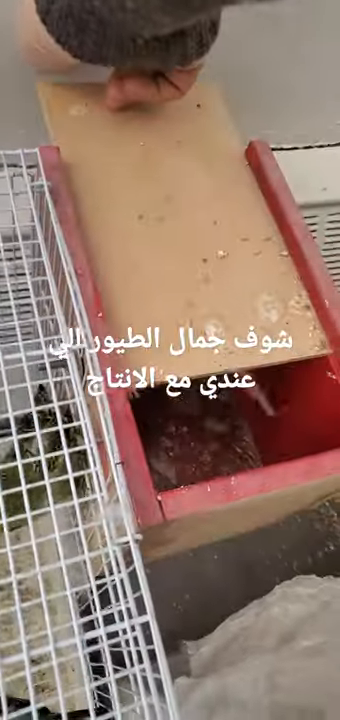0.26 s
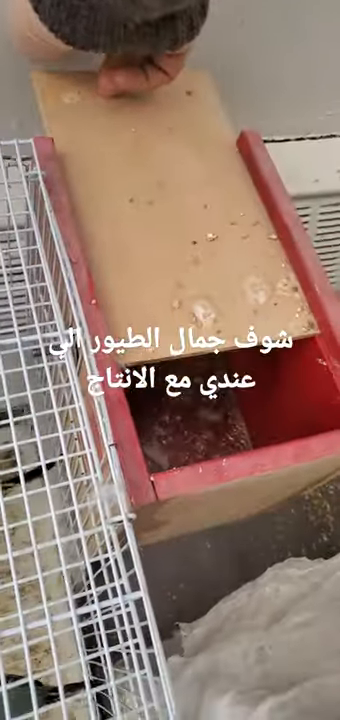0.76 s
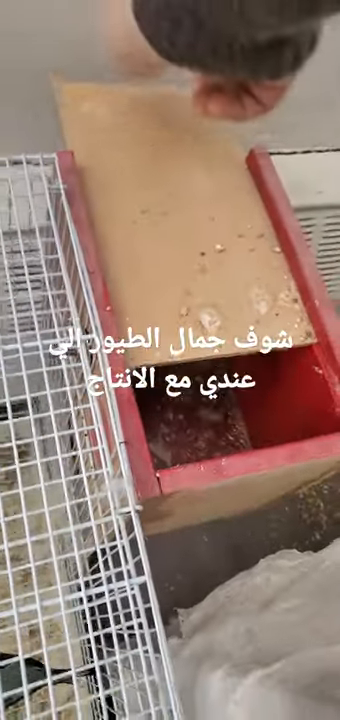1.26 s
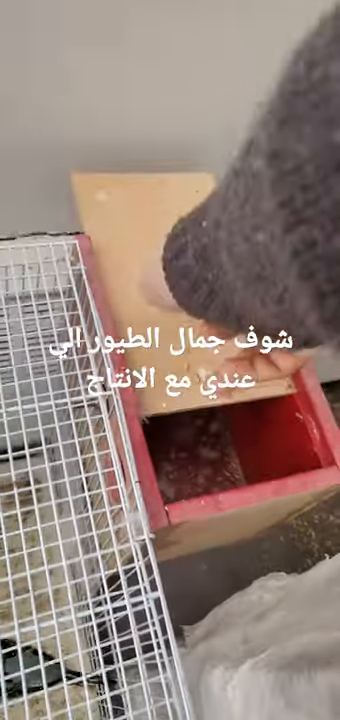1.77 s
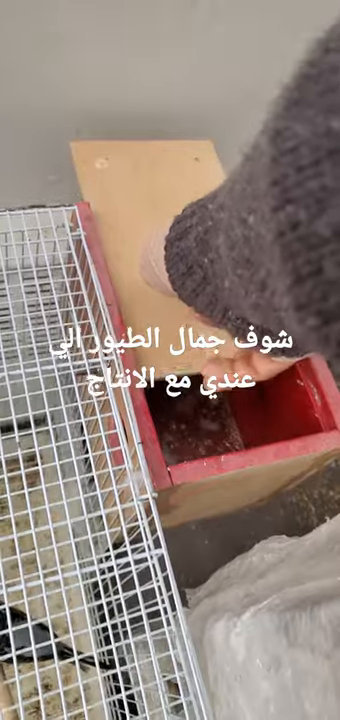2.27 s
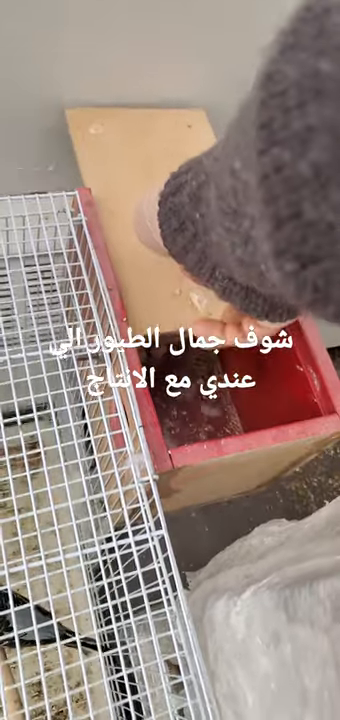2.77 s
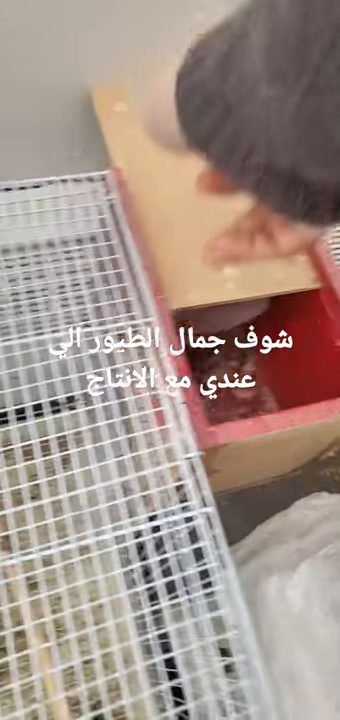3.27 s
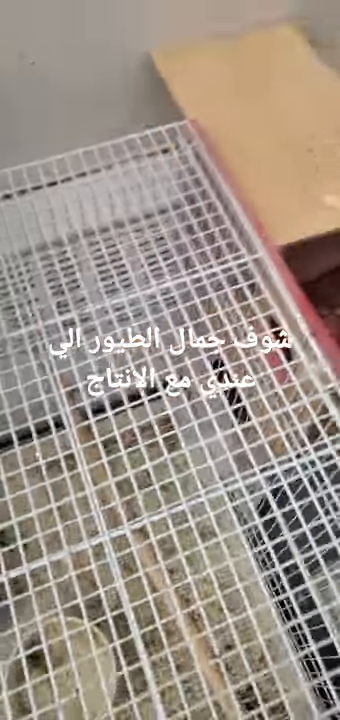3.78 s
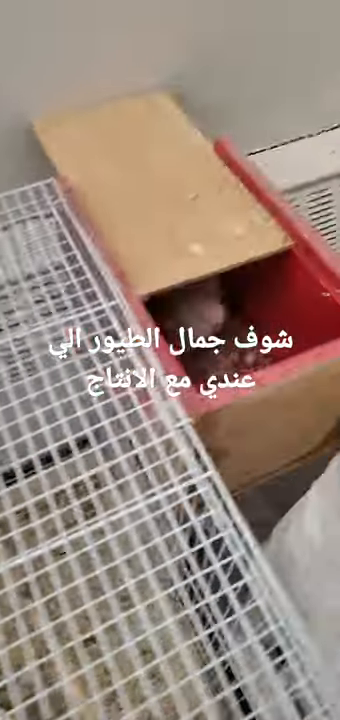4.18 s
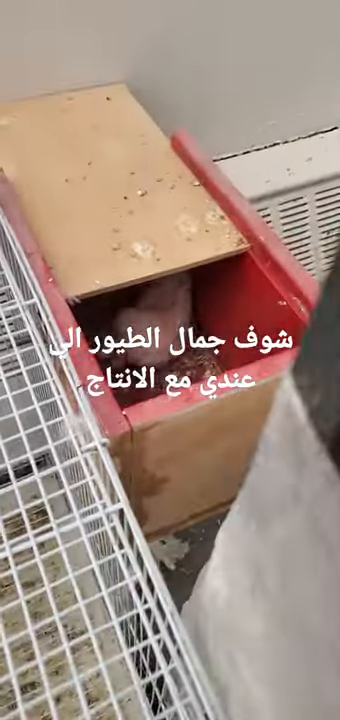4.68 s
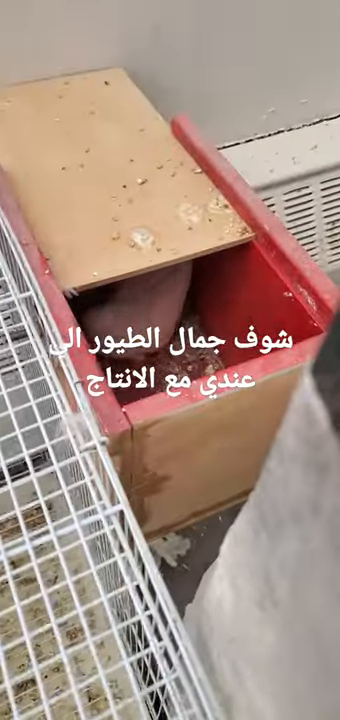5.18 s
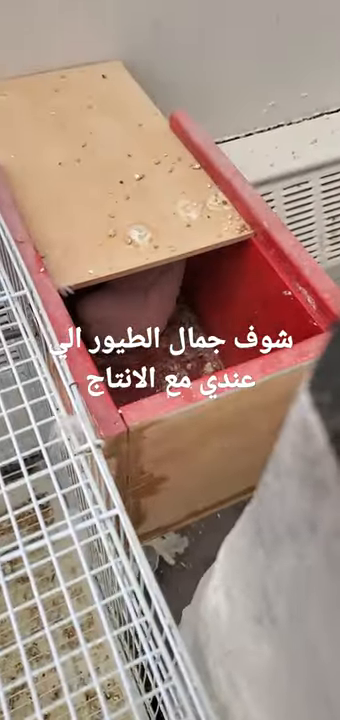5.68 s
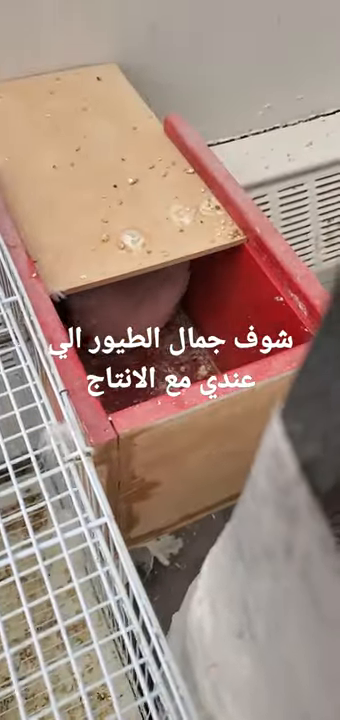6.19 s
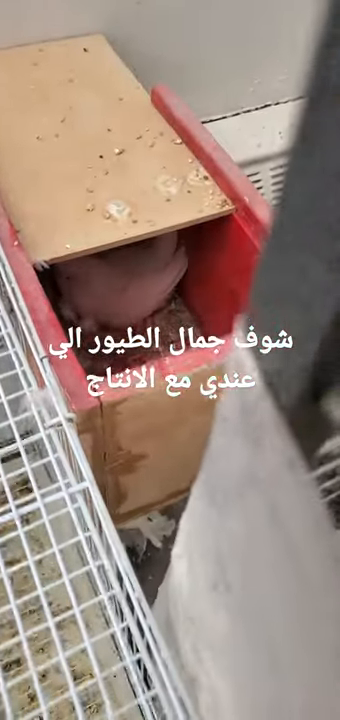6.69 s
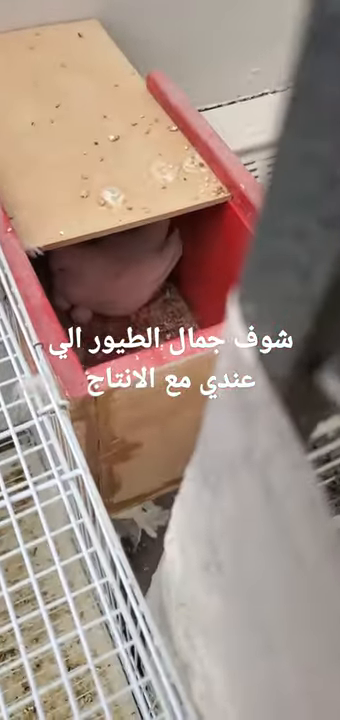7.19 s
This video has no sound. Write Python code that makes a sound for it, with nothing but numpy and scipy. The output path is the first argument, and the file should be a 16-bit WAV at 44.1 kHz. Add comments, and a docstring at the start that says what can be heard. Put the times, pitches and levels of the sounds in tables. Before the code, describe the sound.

Close up, a young budgerigar in a wooden nest box begs without pause, in short harsh rasps six or seven a second. The lid knocks lightly during the first second, a hand thuds the box near the three-second mark, and sleeve and fingers rub softly. Other birds whistle faintly in the small, hard room above a low hum and light hiss.

```python
"""Budgerigar chick begging in a nest box

Harsh rasping cheeps, six or seven a second, close to a phone that moves from the lid round to the opening:
bursts of noise puffed by the syrinx, coloured by throat, box and microphone place. Lid knocks and a box thud
are ringing wood modes; rubbing is shaped noise. Other budgerigars whistle faintly in the small, echoing room,
over a low hum of wandering tones and a floor of rumble and hiss."""
import sys
import numpy as np
from scipy import signal
from scipy.fft import rfft, irfft, next_fast_len
from scipy.io import wavfile

SR = 44100
rng = np.random.default_rng(int(sys.argv[2]) if len(sys.argv) > 2 else 0)


def output_pcm(signal):
    """Save a mono or channel-first signal as 16-bit PCM at the path in sys.argv[1].

    Samples are clipped to [-1, 1] before scaling.
    """
    pcm = np.clip(np.atleast_2d(signal).T, -1, 1) * 32767
    wavfile.write(sys.argv[1], SR, np.round(pcm).astype(np.int16))


N = 327663
TIME = np.arange(N) / SR
TOP_HZ = 15900  # upper limit of the recorded sound


def undb(db):
    """Decibels to gain."""
    return 10 ** (np.asarray(db) / 20)


def unit(x):
    """Scale to rms 1."""
    return x / np.sqrt(np.mean(x ** 2) + 1e-18)


def read(points, hz):
    """Read a (hz, value) table along log frequency."""
    table_hz, value = np.transpose(points)
    return np.interp(np.log(hz + 1), np.log(table_hz), value)


def at(curve, s):
    """Read a (s, value) curve at time s."""
    return np.interp(s, *np.transpose(curve))


def peak(hz, centre_hz, width_hz):
    """Bell-shaped outline of a resonance, 1 at its centre."""
    return 1 / (1 + ((hz - centre_hz) / width_hz) ** 2)


def noise(points, size):
    """Noise coloured by a (hz, db) table, rms 1."""
    hz = np.fft.rfftfreq(size, 1 / SR)
    white = rng.standard_normal(size)
    return unit(irfft(rfft(white) * undb(read(points, hz)), size))


def walk(rate, size):
    """A random drift with about `rate` turns a second."""
    steps = np.arange(size) / SR * rate
    return np.interp(steps, np.arange(2048), rng.standard_normal(2048))


def add(out, s, x):
    """Mix x into out from time s, trimming whatever falls outside."""
    i = int(round(s * SR))
    x = x[..., max(-i, 0):max(N - i, 0)]
    start = max(i, 0)
    out[:, start:start + x.shape[-1]] += x


def chick(size=8192, early_s=.0045, lowest_hz=950):
    """Each rasp passes the throat, the box and the shading of the two microphones."""
    # the begging cheeps: start_s, middle_band_db
    cheeps = [(.005, -16), (0.12, -16.5), (.245, -16), (.371, -16.5), (.504, -16), (0.642, -17.5),
              (.785, -17), (0.943, -16), (1.108, -16), (1.268, -18.5), (1.423, -17), (1.583, -17.5),
              (1.749, -17.5), (1.928, -20), (2.083, -20.5), (2.23, -19.5), (2.377, -19), (2.523, -19.5),
              (2.673, -19.5), (2.816, -18.5), (2.968, -18), (3.116, -16), (3.271, -16.5), (3.428, -15),
              (3.601, -16), (3.762, -15.5), (3.901, -15), (4.043, -16), (4.177, -17), (4.325, -16),
              (4.482, -15), (4.632, -17), (4.772, -17), (4.914, -17.5), (5.064, -16), (5.217, -15.5),
              (5.372, -15.5), (5.528, -15), (5.69, -16), (5.856, -16.5), (6.024, -17), (6.196, -17),
              (6.397, -17), (6.586, -16), (6.784, -16.5), (6.999, -16), (7.166, -16.5), (7.328, -16)]
    # cheeps start clipped and draw out as the chick settles into begging: time_s, length_s
    cheep_length = [(0, 0.045), (.65, 0.059), (.95, 0.07), (2.1, 0.064), (2.9, 0.074)]
    # the phone's swing round the box: time_s, share_of_way (0-1), left_lead_ms
    swing = [(2.9, 0.27, 0.024), (3.7, 0.52, .12), (5.2, 0.88, 0.12), (6.3, 1, 0.13)]
    hz = np.fft.rfftfreq(size, 1 / SR)
    shape = (2, 60)  # sides, bounces
    walls = rng.exponential(size=shape), rng.choice([-1., 1.], shape), rng.standard_normal(shape)
    beak = 1 - np.exp(-(hz / lowest_hz) ** 5)  # so small a bird radiates no bass
    swing_s, share, lead = np.transpose(swing)
    out = np.zeros((2, N))
    for (s, db), chance in zip(cheeps, rng.standard_normal((len(cheeps), 2))):
        length = at(cheep_length, s)
        beside = np.interp(s, swing_s, share)
        lead_ms = np.interp(s, swing_s, lead)
        # the rasp starts early_s before the listed time and swells in softly
        voice = rfft(rasp(length + early_s, size)) * beak
        voice = voice * box_paths(s, lead_ms, walls, hz)
        colour = place_colour(s, hz) + throat(s, beside, chance, hz)
        voice = voice * undb(colour + microphone_shade(beside, hz))
        cheep = irfft(voice * undb(db + effort(voice, s, length, hz)))
        add(out, s - early_s, cheep[:, :SR // 7])
    return out


def rasp(length, size, flutter_hz=141, jitter=0.038, puff_s=0.0017, leak=0.2, scatter_db=-1.0,
         grain_db=2.0, swell_s=0.011, sag_db=-2, release_s=0.011):
    """The syrinx opens in uneven puffs; each puff is a burst of chaotic, crackling vibration."""
    t = np.arange(size) / SR
    puffs = np.zeros(size)
    start = 0
    for late, strength in rng.standard_normal((16, 2)):
        age = np.maximum(t - start, 0) / puff_s
        puffs += undb(scatter_db * strength) * age * np.exp(1 - age)
        start += (1 + jitter * late) / flutter_hz
    # pressure builds over the first few puffs; a 75 ms rasp takes swell_s, shorter ones are snapped out
    rise_s = swell_s * (length / .075) ** 2
    release = np.clip((length - t) / release_s, 0, 1)
    pressure = (1 - np.exp(-(t / rise_s) ** 2)) * release
    sag = undb(sag_db * np.minimum(t / length, 1))
    crackle = rng.standard_normal(size) * undb(grain_db * walk(2500, size))
    # later the syrinx closes less and the puffs run together
    flow = puffs + 2 * leak * t / length
    return flow * pressure * sag * crackle


def throat(s, beside, chance, hz, upper_db=4, lower_db=6, width_hz=280, facing_db=4, scatter=0.036):
    """Two moving throat resonances, in dB, scattered from cheep to cheep."""
    # upper resonance before scatter: time_s, centre_hz
    upper_throat = [(2.8, 6250), (3, 7260), (3.76, 7200), (3.9, 6500), (4.1, 5540), (5.7, 5500),
                    (6.5, 5100), (7.2, 5800)]
    # lower resonance before scatter: time_s, centre_hz
    lower_throat = [(.7, 4220), (1.1, 3350), (3.65, 2250), (4.04, 4040), (4.63, 3699), (4.8, 2270),
                    (5.85, 3430), (6.4, 1870), (7, 1870), (7.3, 4000)]
    centres_hz = np.array([at(upper_throat, s), at(lower_throat, s)])
    upper_hz, lower_hz = centres_hz * (1 + scatter * chance)
    # the upper one stands out more as the phone comes round to the opening
    upper = (upper_db + facing_db * beside) * peak(hz, upper_hz, width_hz)
    return upper + lower_db * peak(hz, lower_hz, width_hz)


def box_paths(s, lead_ms, walls, hz, echo_db=0, first_s=.0007, spread_s=.0025, drift=.07):
    """The direct path and the bounces inside the box; their lengths creep as the phone moves."""
    flight, sign, creep = walls
    paths = np.zeros((2, 2 * len(hz) - 2))
    for side in range(2):
        stretch = np.exp(drift * creep[side] * (s - TIME[-1] / 2))
        delay = (first_s + spread_s * flight[side]) * stretch
        sample = np.clip(delay * SR, 0, len(hz) // 2).astype(int)
        np.add.at(paths[side], sample, sign[side])
    bounces = rfft(paths) / np.sqrt(sign.shape[1]) * undb(echo_db)
    lag_s = np.array([[0], [lead_ms / 1000]])  # the right microphone hears it later
    direct = np.exp(-2j * np.pi * hz * lag_s)
    return direct + bounces


def place_colour(s, hz, thin_db=-7.5):
    """Colour of the cheeps, in dB, blended between four places of the phone round the box."""
    # phone at the narrow lid gap: hz, relative_db
    lid_narrow = [(1250, -19), (2100, -14), (3000, -6), (4000, -6), (4500, -15.5), (5700, -4.5),
                  (8100, -11), (8900, -10), (11900, 7), (13700, -3.5), (15500, 1)]
    # phone under the arm: hz, relative_db
    under_arm = [(1250, -3.5), (2100, -6), (2500, -1), (4500, -6), (5900, -3), (7000, -8), (8100, 1.5),
                 (9200, -15.5), (11600, -3.5), (14000, -14.5), (15500, -12)]
    # phone beside the box: hz, relative_db
    beside_box = [(1400, -20.5), (1930, -3.5), (2160, -16.5), (2600, -4.5), (4700, -5), (5550, -4),
                  (7400, -10), (9400, -18), (12000, -7), (15500, -14)]
    # phone at the opening: hz, relative_db
    at_opening = [(1200, -21.5), (1900, -8), (2200, -11.5), (2750, -6), (3200, -14.5), (3650, -0.5),
                  (4450, -10.5), (5250, -2), (5900, -2), (7200, -7), (8500, -4.5), (9600, -19.5),
                  (15500, -26)]
    # when the phone is at each of these places: time_s
    place_s = [0.5, 2.5, 4.8, 6.6]
    colours = np.array([read(c, hz) for c in (lid_narrow, under_arm, beside_box, at_opening)])
    place = np.array([np.interp(s, place_s, row) for row in np.eye(len(place_s))])
    # at the opening the cheeps sound thinner around 3.1 kHz
    thinning = place[-1] * thin_db * peak(hz, 3100, 280)
    return place @ colours + thinning


def microphone_shade(beside, hz):
    """Each microphone takes half the left-right difference, in dB, as the phone swings round."""
    # shading above the box: hz, left_minus_right_db
    shade_above = [(1200, -2), (4000, -2.5), (5400, 0), (7200, 2.5), (8200, 2.5), (11000, -4.5), (13500, 0)]
    # shading beside the box: hz, left_minus_right_db
    shade_beside = [(1200, 4.5), (4000, -1), (5400, 5.5), (8400, 9), (11200, 0), (13400, 6)]
    shade = (1 - beside) * read(shade_above, hz) + beside * read(shade_beside, hz)
    return np.array([shade, -shade]) / 2


def effort(voice, s, length, hz, knees_hz=(3300, 5000, 8200, 10500)):
    """Effort and beak opening set the weight, in dB, of the low, middle and top of each cheep."""
    # low band against the middle: time_s, relative_db
    low_band = [(.2, -9.5), (.9, -12), (1.93, -6.5), (2.85, -7), (3.95, -12), (4.4, -5), (4.7, -10.5),
                (4.97, -1), (5.25, -12), (5.8, -7.5)]
    # treble against the middle, dropping when the phone leaves the top of the box: time_s, relative_db
    treble = [(3.12, -4), (3.35, -11), (4.3, -6.5), (4.75, -9.5), (4.91, -4.5), (5.1, -10), (5.7, -11.5),
              (6.2, -7.5), (7.3, -10)]
    size = 2 * len(hz) - 2
    levels = []
    for lo, hi in ((1100, 4500), (4500, 9000), (9500, TOP_HZ)):
        band = voice[:, (hz > lo) & (hz < hi)]
        power = np.sum(abs(band) ** 2) / (size * length * SR)
        levels.append(10 * np.log10(power))
    low, mid, top = levels
    return np.interp(hz, knees_hz, [at(low_band, s) - low, -mid, -mid, at(treble, s) - top])


def handling(thud_s=2.832, thud_db=-19):
    """The lid knocks on its rails, the hand bumps the box once; sleeve and fingers rub."""
    # knocks of the lid: start_s, level_db, contact_ms
    knocks = [(0.118, -30, 1.8), (0.769, -20, 0.37), (0.996, -22.5, 2.8)]
    # modes of the lid: mode_hz, relative_db, t60_s
    lid_modes = [(290, -14, .11), (328, 19.5, 0.098), (797, 13, 0.079)]
    # modes of the box in its one thud: mode_hz, relative_db, t60_s
    box_modes = [(208, -12, 0.21), (256, 0, 0.25), (400, 2, 0.092), (511, 10, .09)]
    # sleeve and hand rubbing: start_s, length_s, rumble_db, rustle_db
    rubs = [(-.3, 0.67, -51, -41), (1.037, 0.17, -33, -42), (3.117, .36, -32.5, -41.5),
            (3.622, 0.16, -39, -33.5), (5.044, 0.5, -42, -38.5)]
    out = np.zeros((2, N))
    for s, db, contact_ms in knocks:
        add(out, s, undb(db) * strike(lid_modes, contact_ms, clatter_db=-16))
    add(out, thud_s, undb(thud_db) * strike(box_modes, .5, clatter_db=-2.5))
    rustle_colour = [(100, -12), (310, 4.5), (500, -2.0), (8000, -18.5)]
    for s, length, rumble_db, rustle_db in rubs:
        n = int(length * SR)
        rumble = noise([(35, -11.5), (80, -6), (700, -55)], SR)[:n]
        rustle = np.array([noise(rustle_colour, SR)[:n] for _ in range(2)])
        flicker_db = 2 * walk(47.5, n)
        rub = undb(rumble_db) * rumble + undb(rustle_db + flicker_db) * rustle
        add(out, s, np.hanning(n) * rub)
    return out


def strike(modes, contact_ms, clatter_db, clatter_s=0.027):
    """Wood rings in its modes with a short clatter; a longer contact dulls the ring."""
    t = TIME[:SR // 3]
    ring = 0
    for hz, db, t60 in modes:
        dulling = 1 + (hz * contact_ms / 1000) ** 2
        ring = ring + undb(db) / dulling * np.sin(2 * np.pi * hz * t) * undb(-60 * t / t60)
    clatter = noise([(120, -59), (230, 15.5), (750, -8.5), (1600, -54)], len(t))
    clatter = clatter * np.exp(-t / clatter_s)
    return ring / np.max(abs(ring)) + undb(clatter_db) * clatter


def flock(waver=0.04, flicker_db=4.5, overtone_db=-15):
    """Short gliding whistles, hoarse from a quick waver, with a weak octave."""
    # chirps of the other birds: start_s, length_s, from_hz, to_hz, level_db
    chirps = [(1.022, 0.096, 3056, 3370, -34), (2.77, .03, 4300, 4270, -33),
              (2.799, 0.098, 3026, 3330, -27.5), (2.892, 0.042, 3970, 3980, -28),
              (3.032, 0.061, 4640, 4630, -32), (5.041, 0.057, 2930, 2680, -28),
              (5.588, 0.11, 3540, 3270, -32.5), (5.734, 0.11, 3130, 3360, -33.5),
              (5.835, 0.083, 4530, 4700, -27.5), (5.912, 0.059, 4590, 4470, -24),
              (6.427, 0.04, 3700, 3670, -32)]
    out = np.zeros((2, N))
    for s, length, from_hz, to_hz, db in chirps:
        n = int(length * SR)
        pitch_hz = np.linspace(from_hz, to_hz, n) * (1 + waver * walk(723, n))
        phase = 2 * np.pi * np.cumsum(pitch_hz) / SR
        swell = signal.windows.tukey(n, .5) * undb(flicker_db * walk(245, n))
        whistle = np.sin(phase) + undb(overtone_db) * np.sin(2 * phase)
        add(out, s, undb(db) * unit(swell * whistle))
    return out


def room(x, build_s=0.0066):
    """A small hard room: a diffuse tail whose treble dies first."""
    # echo bands of the room: centre_hz, level_db, t60_s
    room_bands = [(1140, -5, 0.55), (3620, -7.5, 0.37), (7500, -10.5, 0.33), (11200, -11.5, 0.19)]
    t = TIME[:SR // 2]
    hz = np.fft.rfftfreq(len(t), 1 / SR)
    diffuse = rfft(rng.standard_normal((2, len(t))))
    centres = [row[0] for row in room_bands]
    tail = 0
    for weights, (_, db, t60) in zip(np.eye(len(room_bands)), room_bands):
        fade = undb(-60 * t / t60) * np.minimum(t / build_s, 1)
        band = irfft(diffuse * read(list(zip(centres, weights)), hz), len(t))
        tail = tail + undb(db) * band * fade / np.linalg.norm(fade)
    return signal.fftconvolve(x, tail, axes=1)[:, :N]


def background(wander_hz=0.32, shared_below_hz=350, floor_db=-42.5):
    """Machine tones, the two lowest beating, over rumble and hiss; the bass is alike on both sides."""
    # swell of the hum: time_s, level_db
    hum_level = [(4.4, -41.5), (6.95, -34.5), (7.4, -41.5)]
    # tones of the hum: tone_hz, relative_db
    hum_tones = [(68.2, -1.5), (63.3, -6.5), (352.5, -21), (551, -27)]
    # colour of the room's rumble and hiss: hz, relative_db
    floor_colour = [(40, -1.5), (85, -5), (160, -18.5), (340, -16), (500, -23.5), (3000, -27.5),
                    (15000, -35)]
    tones = 0
    for hz, db in hum_tones:
        phase = 2 * np.pi * np.cumsum(hz + wander_hz * walk(2.51, N)) / SR
        tones = tones + undb(db) * np.sqrt(2) * np.sin(phase)
    hum = tones * undb(at(hum_level, TIME))
    side_filter = signal.butter(1, shared_below_hz, "high", fs=SR, output="sos")
    side = signal.sosfilt(side_filter, noise(floor_colour, N))
    air = undb(floor_db) * (noise(floor_colour, N) + np.array([side, -side]))
    air = signal.sosfilt(signal.butter(4, 36, "high", fs=SR, output="sos"), air)
    return (hum + air) * undb([[-.8], [.8]])  # a little louder on the right


def scene(lid_room_db=-6, flock_direct_db=-3, flock_room_db=4):
    """The chick and the lid are near; the other birds come mostly by way of the room."""
    cheeps, lid, others = chick(), handling(), flock()
    echo = room(cheeps + undb(lid_room_db) * lid + undb(flock_room_db) * others)
    return cheeps + lid + undb(flock_direct_db) * others + echo + background()


def record(dry, widen=0.2):
    """The phone colours the sound, widens the midrange, clips the highest peaks and cuts the top."""
    # colour of the phone's microphones: hz, relative_db
    microphone = [(390, -2.5), (480, -2), (720, 0), (840, 4), (1040, -9.5), (1190, 6), (1450, 0.5)]
    size = next_fast_len(N + SR)
    colour = undb(read(microphone, np.fft.rfftfreq(size, 1 / SR)))
    heard = irfft(rfft(dry, size) * colour, size)[:, :N]
    middle = signal.sosfilt(signal.butter(1, [400, 2400], "band", fs=SR, output="sos"), heard)
    wide = heard - widen * middle[::-1]  # each side loses some of the other's midrange
    top_cut = signal.ellip(10, .2, 80, TOP_HZ, fs=SR, output="sos")
    return signal.sosfilt(top_cut, np.clip(wide, -1, 1))


dry = scene()
out = record(dry)
output_pcm(out)
```